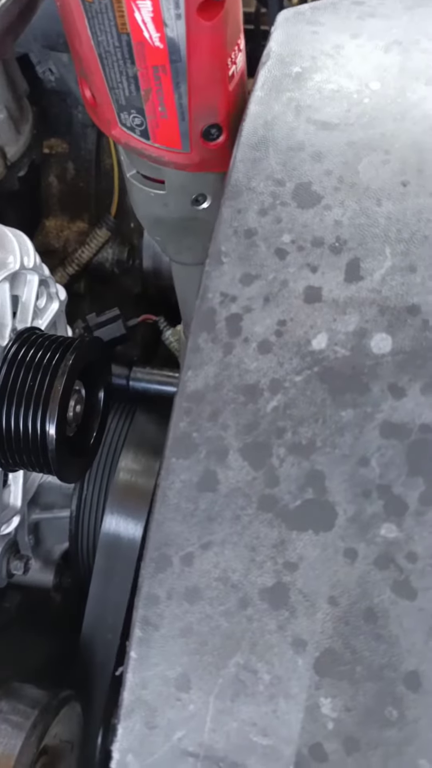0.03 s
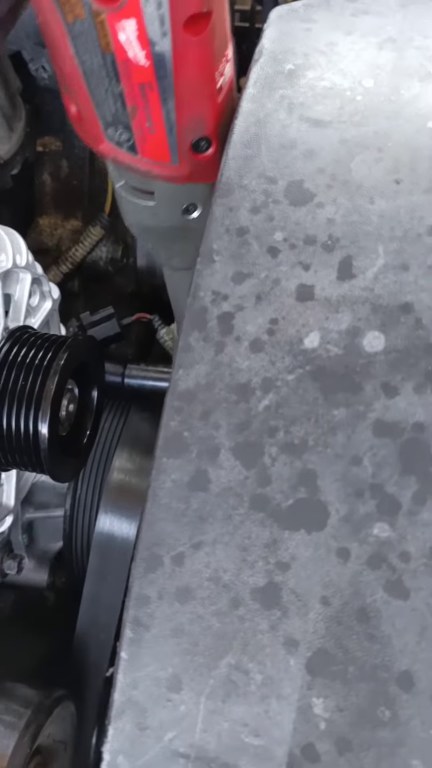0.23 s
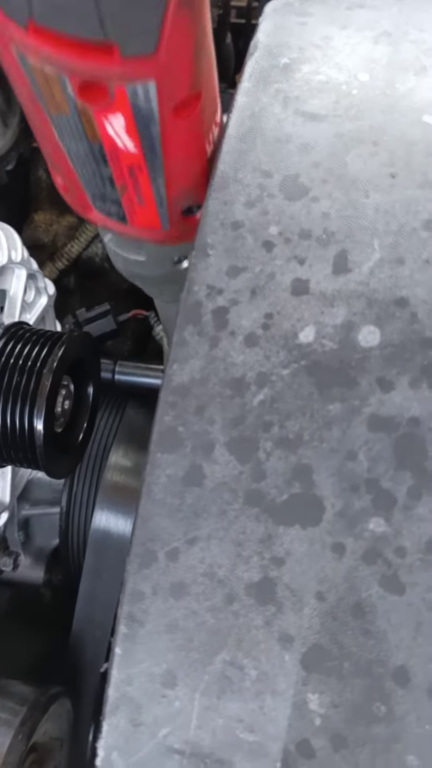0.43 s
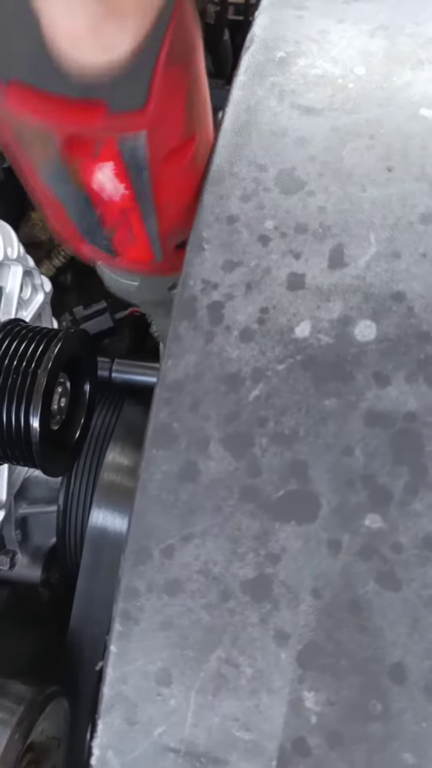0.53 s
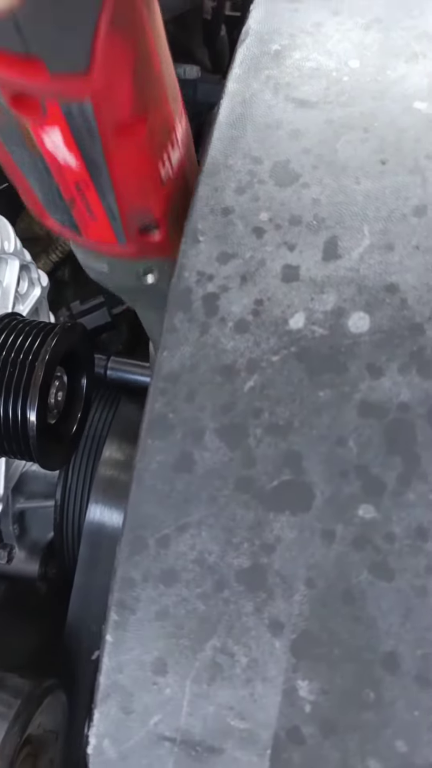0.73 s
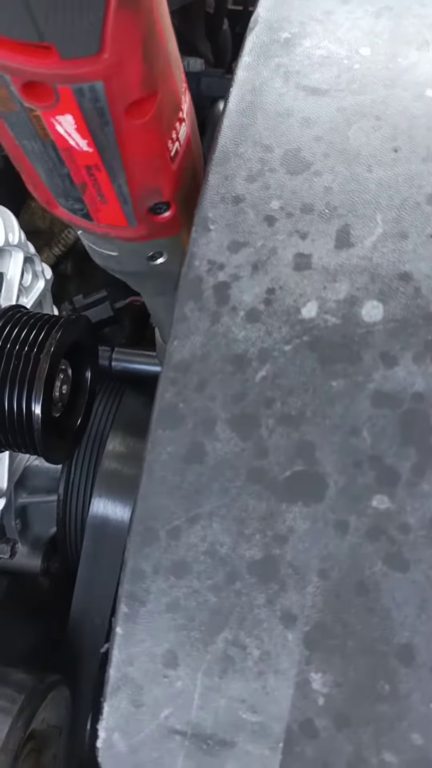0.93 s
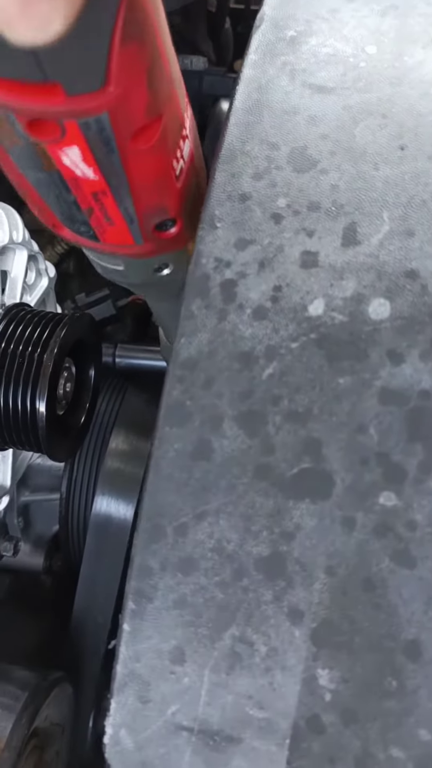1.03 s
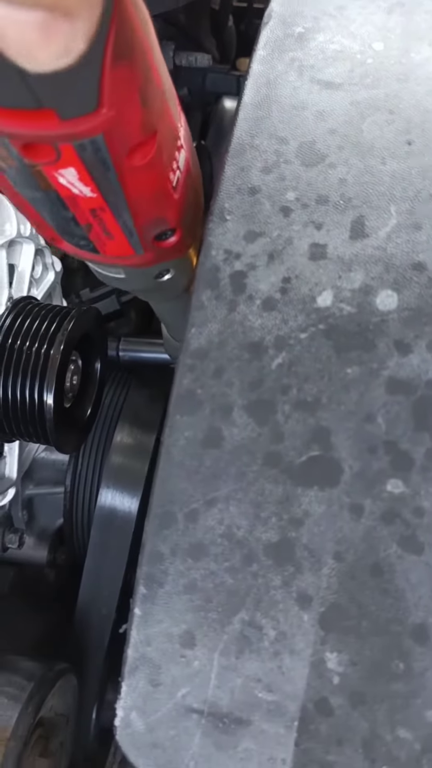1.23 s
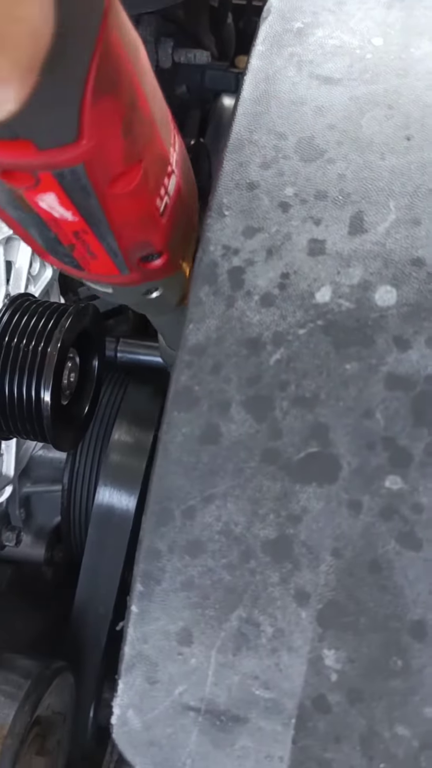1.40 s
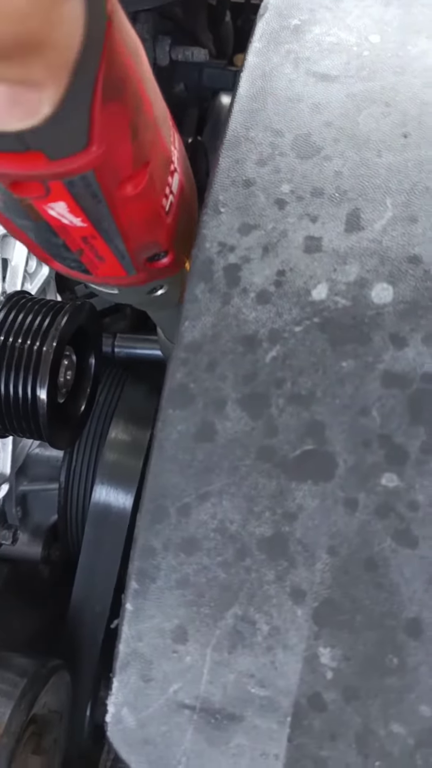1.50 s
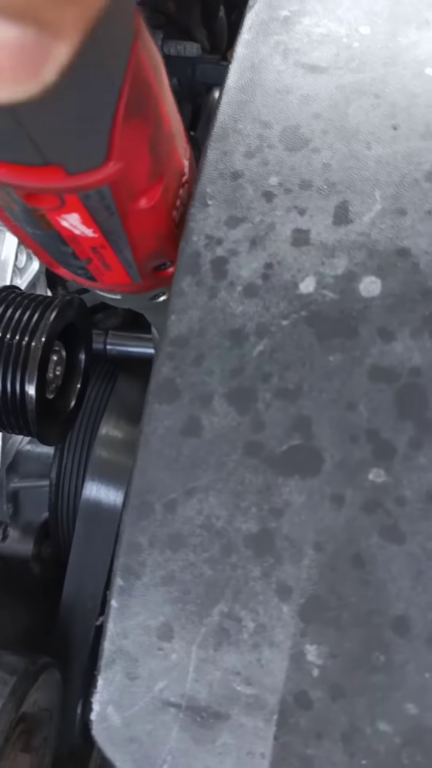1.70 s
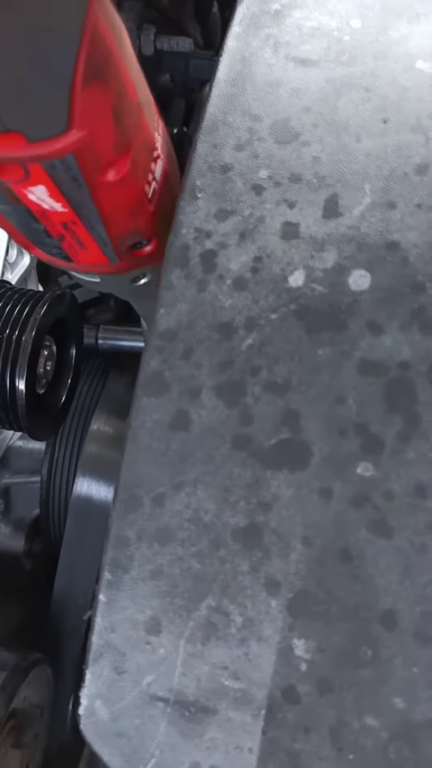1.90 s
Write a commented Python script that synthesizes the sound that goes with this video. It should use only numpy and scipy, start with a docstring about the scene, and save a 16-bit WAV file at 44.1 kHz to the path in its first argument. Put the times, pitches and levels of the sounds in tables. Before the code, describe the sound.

A cordless power ratchet whirs and clatters in one short burst, then light knocks and rubbing

```python
"""A cordless ratchet runs for a third of a second in a car's engine bay, close to the microphone.
Its drive whistles as two tones parting with motor speed; gear teeth and pawl clacks are filtered noise
that also rings the modes of the steel head, and the tool shudders in low resonances.
Decaying partials make the knocks, random grains the rubbing sleeve and the scrapes, resonant noise the
dull bumps, and a short ping with ringing modes one sharp snap of steel, all over low rumble and hum."""
import sys
import numpy as np
from scipy import signal
from scipy.fft import rfft, irfft
from scipy.io import wavfile
from scipy.ndimage import uniform_filter1d

SR = 44100
rng = np.random.default_rng(int(sys.argv[2]) if len(sys.argv) > 2 else 0)


def put_to_file(sound):
    """Save the sound as 16-bit audio at rate SR, in the file named by the first command-line argument."""
    columns = np.atleast_2d(sound).T  # one column per channel
    safe = np.clip(columns, -1, 1)
    whole_steps = np.round(safe * 32767)
    wavfile.write(sys.argv[1], SR, whole_steps.astype(np.int16))


N = 85995
TIME = np.arange(N) / SR  # s


def amp(db):
    """The decibel law: 20 dB is a factor of ten in amplitude."""
    return 10 ** (np.asarray(db) / 20)


def unit(x):
    """Normalisation to an rms of 1, so that a later gain sets the level."""
    return x / np.sqrt(np.mean(x ** 2) + 1e-20)


def curve(rows, axis=1):
    """Linear interpolation of one column of a time table."""
    rows = np.array(rows)
    return np.interp(TIME, rows[:, 0], rows[:, axis])


def colour(x, points):
    """Linear filtering by a spectrum that falls away below its first point; rms 1."""
    hz = np.fft.rfftfreq(N, 1 / SR) + 1
    f, db = np.transpose(points)
    gain = amp(np.interp(np.log(hz), np.log(f), db))
    gain = gain * np.minimum(hz / f[0], 1) ** 2
    return unit(irfft(rfft(x) * gain, N))


def noise(points):
    """Filtered Gaussian noise with the given spectral shape."""
    return colour(rng.standard_normal(N), points)


def blow(start, rise, t60):
    """Impact envelope: a linear rise, then exponential decay by 60 dB in t60 seconds."""
    t = np.maximum(TIME - start, 0)
    decay = np.exp(-np.log(1000) * np.maximum(t - rise, 0) / t60)
    return np.minimum(t / rise, 1) * decay


def tone(hz):
    """Phase as the integral of frequency: a sine of rms 1 on a steady or moving pitch."""
    cycles = np.cumsum(hz * np.ones(N)) / SR + rng.random()
    return np.sqrt(2) * np.sin(2 * np.pi * cycles)


def grains(per_s, spread_db):
    """Shot noise: tiny impacts at random instants, of uneven size and either sign."""
    size = amp(spread_db * np.minimum(rng.exponential(1, N), 3))
    sign = rng.choice([-1, 1], N)
    return size * sign * (rng.random(N) < per_s / SR)


def resonant(modes):
    """Resonance: noise passed by a few peaks, each given by centre Hz, width Hz and dB; rms 1."""
    hz = np.fft.rfftfreq(N, 1 / SR)
    gain = sum(amp(db) / (1 + (2 * (hz - f) / width) ** 2) for f, width, db in modes)
    return unit(irfft(rfft(rng.standard_normal(N)) * gain, N))


# Motor speed. Each row: time in seconds, offset of each whistle line from the drive tone in Hz,
# level of the whistle in dB.
MOTOR_SPEED = [(.235, 11.5, -30.5), (.25, 110, -24), (.262, 300, -20.5), (.28, 570, -12),
               (.305, 1160, -13.5), (.335, 960, -20.5), (.42, 1100, -24), (.5, 1080, -21), (.565, 800, -19),
               (.6, 390, -22)]
DRIVE_HZ, DRIVE_ON_S, DRIVE_OFF_S = 7660, .234, .582
OVERTONE_DB = -14.5  # relative to the drive tone
CARRIER_FADE_HZ = 298  # offset at which the unsplit tone has faded to 1/e
WAVER = .004  # rms pitch waver of the fully split lines, as a share of the drive tone


def whistle():
    """Sidebands: the drive's switching tone splits into two lines that part as the motor gains speed."""
    split = curve(MOTOR_SPEED)
    running = (TIME > DRIVE_ON_S) & (TIME < DRIVE_OFF_S)
    on = uniform_filter1d(1. * running, size=90)  # softened edges
    rest = np.exp(-(split / CARRIER_FADE_HZ) ** 2)  # near 1 at low speed
    carrier = tone(DRIVE_HZ) + amp(OVERTONE_DB) * tone(2 * DRIVE_HZ)
    slow_noise = unit(uniform_filter1d(rng.standard_normal(N), size=300))
    offset = split + WAVER * DRIVE_HZ * (1 - rest) * slow_noise
    lines = (tone(DRIVE_HZ + offset) + tone(DRIVE_HZ - offset)) / np.sqrt(2)
    return on * amp(curve(MOTOR_SPEED, axis=2)) * (rest * carrier + (1 - rest) * lines)


# Gear rattle. Each row: time in seconds, level on the steel in dB.
GEAR_RATTLE = [(.16, -94), (.2, -54), (.243, -44), (.25, -26), (.268, -19), (.3, -10), (.44, -6.5),
               (.52, -10.5), (.575, -15), (.6, -35.5), (.635, -39), (.675, -72), (.695, -42.5), (.75, -50),
               (.785, -79), (.82, -96)]
# Pawl clacks. Each row: start in seconds, level of the steel in dB, level of the housing in dB.
PAWL_CLACKS = [(0.247, -18, -46), (0.261, -18, -41), (0.277, -15, -23.5), (0.287, -7.5, -22.5),
               (.302, -7.5, -16.5), (.312, 1, -12.5), (0.325, -3, -19), (.339, -3, -8), (0.353, -0.5, -21),
               (.3615, 0.5, -11), (0.373, -8.5, -20.5), (0.383, -1.5, -13.5), (0.394, -10.5, -20),
               (0.405, -1, -14), (0.417, -6.5, -17.5), (.426, 2, -6.5), (.434, -7.5, -14.5),
               (0.4489, 0.5, -9.5), (.457, -3.5, -16.5), (.462, -3.5, -19.5), (0.4741, 2, -7.5),
               (0.482, 1.5, -11), (0.4873, 0.5, -19.5), (0.5, 1, -6.5), (0.503, 0.5, -12),
               (0.511, -1.5, -20), (0.524, -3, -29), (0.5333, -6, -14), (0.5361, 2.5, -13.5),
               (0.5485, -3.5, -19), (.557, -7.5, -13.5), (0.562, -10.5, -36), (.577, -0.5, -10),
               (0.6152, -10.5, -28), (0.6397, -37.5, -35), (0.647, -46, -40), (.663, -47, -43),
               (0.685, -27, -50), (0.691, -27, -49), (.712, -38.5, -54), (.7161, -32, -56),
               (0.721, -33.5, -65), (.735, -39.5, -55), (0.745, -42, -60), (.755, -34, -42.5),
               (0.8056, -43.5, -71)]
# Spectra of the steel and of the duller housing. Each row: frequency in Hz, relative density in dB per Hz.
STEEL_SPECTRUM = [(1060, -48), (1800, -19.5), (1930, -16.5), (2250, -29), (2600, -11), (3540, -5.5),
                  (4200, -6.5), (4430, -3.5), (5160, -5), (5600, -2), (6070, -5), (6650, -1), (7610, -4.5),
                  (8710, 1.5), (12300, -15.5), (15000, -13), (15500, -6.5)]
HOUSING_SPECTRUM = [(100, -23), (300, -12), (600, -9), (900, -2), (1200, -2.5), (1550, 1), (2100, -6.5),
                    (2800, -4.5), (5000, -24)]
# Modes of the steel head. Each row: frequency in Hz, relative level in dB, t60 in seconds.
HEAD_MODES = [(4820, 5, .07), (5460, -6, 0.079), (5650, 10, 0.059), (6650, -1, .08), (6500, 0, .08),
              (6760, 2, .08), (8000, 1, .07), (8880, -1.5, 0.032), (8150, -7, 0.033), (8660, 2.5, 0.03),
              (9800, -14.5, .16), (9460, -12, 0.063), (10600, -5, 0.038)]
TEETH_PER_S, TEETH_SPREAD_DB = 1300, 2.5  # mean rate, scale of the uneven sizes
CLACK_RISE_S, CLACK_T60_S, HOUSING_T60_S = 0.0011, 0.03, 0.046
GEAR_HOUSING_DB, HEAD_DB = -14.5, -14.5  # relative to the gears on steel, and to all of the steel


def ratchet():
    """Modal excitation: gear teeth and pawl clacks drive the steel head and the duller housing."""
    teeth = grains(TEETH_PER_S, TEETH_SPREAD_DB)
    level = amp(curve(GEAR_RATTLE))
    # overlapping clacks add in power
    bright = np.sqrt(sum((amp(db) * blow(s, CLACK_RISE_S, CLACK_T60_S)) ** 2 for s, db, _ in PAWL_CLACKS))
    dull = np.sqrt(sum((amp(db) * blow(s, CLACK_RISE_S, HOUSING_T60_S)) ** 2 for s, _, db in PAWL_CLACKS))
    steel = level * colour(teeth, STEEL_SPECTRUM) + bright * noise(STEEL_SPECTRUM)
    gear_housing = amp(GEAR_HOUSING_DB) * level * colour(teeth, HOUSING_SPECTRUM)
    housing = gear_housing + dull * noise(HOUSING_SPECTRUM)
    head_response = sum(amp(db) * blow(0, 1 / SR, t60) * tone(hz) for hz, db, t60 in HEAD_MODES)
    ring = unit(signal.fftconvolve(steel, head_response)[:N]) * steel.std()
    return steel + housing + amp(HEAD_DB) * ring


# Shudder of the tool. Each row: time in seconds, level of the bass in dB, level of the low middle in dB.
SHUDDER_LEVELS = [(.28, -80.5, -71), (.315, -70, -42), (.45, -46, -34), (.52, -22.5, -38.5),
                  (.585, -29, -25), (.61, -34, -34), (.68, -39, -43.5), (.74, -59, -55), (.83, -64, -75)]
# Its bass and low middle resonances. Each row: frequency in Hz, width in Hz, relative level in dB.
BASS_RESONANCES = [(92, 14, -3.5), (129, 10, 4)]
MIDDLE_RESONANCES = [(228, 64, -9), (332.3, 26, 2.5), (383, 35, -6.5), (596, 250, -12)]


def shudder():
    """Forced vibration: the tool shakes the low resonances of what it leans on."""
    bass = amp(curve(SHUDDER_LEVELS)) * resonant(BASS_RESONANCES)
    middle = amp(curve(SHUDDER_LEVELS, axis=2)) * resonant(MIDDLE_RESONANCES)
    return bass + middle


# Knocks of tool on engine. Each row: start in seconds, clatter in dB, ring in Hz, ring in dB, t60 in seconds.
ENGINE_KNOCKS = [(.188, -41.5, 1518, -38.5, 0.035), (0.2057, -42, 1621, -44, .05),
                 (0.7571, -36.5, 1023, -34.5, 0.028), (0.8452, -46.5, 1434, -36.5, 0.037),
                 (1.3332, -28.5, 1678, -40.5, 0.037), (1.505, -43, 820, -40, 0.1),
                 (1.587, -50, 1444, -48, 0.031), (1.837, -50, 2620, -48, 0.037),
                 (1.881, -55, 2520, -58, 0.027)]
# Partials of each knock. Each row: multiple of the ring frequency, level relative to the ring in dB.
PARTIALS = [(1, -1), (1.052, -2.5), (1.412, -12), (1.8, -10), (2.15, -11), (2.42, -19)]
# Spectrum of the clatter. Each row: frequency in Hz, relative density in dB per Hz.
CLATTER_SPECTRUM = [(300, -34.5), (900, -9.5), (1600, 3), (2300, -1.5), (3500, 3), (6000, 0.5), (9000, -8),
                    (11000, -24), (15500, -28)]
# Long faint rings. Each row: start in seconds, frequency in Hz, level in dB, t60 in seconds.
FAINT_RINGS = [(.76, 2977, -59, 1.0), (.8448, 1520, -66, .5), (.8448, 797, -63, .7), (.05, 797, -61, .5)]
KNOCK_RISE_S, RING_RISE_S = 0.0023, .04


def knocks():
    """Inharmonic free vibration: each contact is a clatter and short partials; some parts ring on faintly."""
    clatter = noise(CLATTER_SPECTRUM)
    out = np.zeros(N)
    for s, db, hz, ring_db, t60 in ENGINE_KNOCKS:
        ring = sum(amp(part_db) * tone(hz * multiple) for multiple, part_db in PARTIALS)
        out += blow(s, KNOCK_RISE_S, t60) * (amp(db) * clatter + amp(ring_db) * ring)
    return out + sum(amp(db) * blow(s, RING_RISE_S, t60) * tone(hz) for s, hz, db, t60 in FAINT_RINGS)


def high_pass(x, hz, order=6):
    """Butterworth filtering that cuts the bass steeply."""
    return signal.sosfilt(signal.butter(order, hz, "high", fs=SR, output="sos"), x)


# Small parts that ring after the snap. Each row: frequency in Hz, level in dB, t60 in seconds.
SNAP_PART_MODES = [(740, -45, .04), (904, -40, 0.052), (1517, -44, 0.036), (2770, -40, 0.038),
                   (3295, -43, .05), (7110, -26, 0.048), (8200, -42, 0.036), (11220, -31, 0.019)]
# Spectrum of the snap's clatter. Each row: frequency in Hz, relative density in dB per Hz.
SNAP_SPECTRUM = [(500, -47), (660, -8), (850, 2), (1150, -15), (1500, -3), (2150, -17.5), (2800, 3.5),
                 (3400, -4.5), (4200, -12.5), (6000, -13), (6900, 5), (7800, -5), (8600, 3), (10000, -13),
                 (11200, -4.5), (12500, -22), (16000, -14)]
SNAP_S, SNAP_DB, SNAP_HZ, SNAP_LENGTH_S = 1.6133, -9.5, 6900, 0.0031  # the ping
SNAP_CLATTER_DB, SNAP_T60_S, SNAP_LOW_HZ = -16.5, 0.034, 620


def snap():
    """Impulsive excitation: a very short high ping of steel, then the small parts ring, with the bass cut."""
    window = np.sin(np.pi * np.clip((TIME - SNAP_S) / SNAP_LENGTH_S, 0, 1)) ** 2
    ping = window * tone(SNAP_HZ) / np.sqrt(2)
    modes = sum(amp(db) * blow(SNAP_S, CLACK_RISE_S, t60) * tone(hz) for hz, db, t60 in SNAP_PART_MODES)
    clatter = amp(SNAP_CLATTER_DB) * blow(SNAP_S, CLACK_RISE_S, SNAP_T60_S) * noise(SNAP_SPECTRUM)
    return amp(SNAP_DB) * ping + high_pass(modes + clatter, SNAP_LOW_HZ)


# Short bright slides of steel on steel. Each row: middle in seconds, half length in seconds, level in dB.
STEEL_SLIDES = [(0.718, 0.0045, -40), (1.462, .008, -52), (1.573, 0.015, -49), (1.703, .014, -55)]
# Spectrum of the slides. Each row: frequency in Hz, relative density in dB per Hz.
SLIDE_SPECTRUM = [(2500, -18), (4500, -4), (7000, -3), (9200, 7), (11000, -7), (14000, -3), (15500, -5)]
SLIDE_GRAINS_PER_S, FRICTION_SPREAD_DB = 6600, 4.5  # the spread serves the sleeve too


def slides():
    """Friction as many tiny impacts: the socket shifts on the bolt with a brief fine scrape."""
    level = sum(amp(db) * np.exp(-((TIME - s) / half) ** 2) for s, half, db in STEEL_SLIDES)
    return level * colour(grains(SLIDE_GRAINS_PER_S, FRICTION_SPREAD_DB), SLIDE_SPECTRUM)


# Sleeve rubbing. Each row: time in seconds, level of the body in dB, level of the treble in dB.
RUB_LEVELS = [(0, -81, -76.5), (.13, -75.5, -73), (.2, -55.5, -56), (.7, -47.5, -51.5), (.86, -68, -70.5),
              (.95, -77, -69), (1.03, -55, -56.5), (1.09, -46, -49), (1.16, -54, -57), (1.24, -66.5, -63),
              (1.29, -80, -73), (1.36, -50, -54.5), (1.42, -51, -54.5), (1.48, -53, -55.5),
              (1.57, -59, -51), (1.63, -52, -52), (1.7, -46.5, -47), (1.74, -50.5, -54), (1.82, -49, -54),
              (1.88, -61, -60.5), (1.95, -75, -70)]
# Spectra of the rub's body and treble. Each row: frequency in Hz, relative density in dB per Hz.
BODY_SPECTRUM = [(100, -12.5), (280, -9), (450, -21), (630, -8.5), (800, 4.5), (1100, -1.5), (1450, 2.5),
                 (1850, -8.5), (2300, -34), (4000, -48)]
TREBLE_SPECTRUM = [(1200, -24.5), (2300, -5), (3000, 1.5), (3700, 3), (4500, -1), (5500, 4), (7000, 1),
                   (9000, 2.5), (10300, -8), (12500, -13), (15500, -6)]
RUB_GRAINS_PER_S = 9000


def sleeve():
    """Friction of cloth: the sleeve rubs in fine grains that sound in a body and a treble band."""
    fibres = grains(RUB_GRAINS_PER_S, FRICTION_SPREAD_DB)
    body = amp(curve(RUB_LEVELS)) * colour(fibres, BODY_SPECTRUM)
    treble = amp(curve(RUB_LEVELS, axis=2)) * colour(fibres, TREBLE_SPECTRUM)
    return body + treble


# Dull bumps of hand and tool. Each row: start in seconds, level in dB, resonance in Hz, t60 in seconds.
DULL_BUMPS = [(0, -57.5, 543, .12), (0.074, -53.5, 280, 0.27), (.9, -57, 650, 0.11),
              (1.105, -51, 277, 0.16), (1.454, -55.5, 535, 0.14), (1.502, -41, 540, 0.18),
              (1.506, -39, 283, .16), (1.525, -41, 210, 0.13), (1.568, -44.5, 243, 0.11),
              (1.834, -49, 590, 0.059), (1.849, -48.5, 282, 0.1)]
BUMP_RISE_S, BUMP_WIDTH = 0.0087, 0.41  # the width is a share of the resonance


def bumps():
    """Damped broad resonance: the hand bumps the tool against hollow parts."""
    out = np.zeros(N)
    for s, db, hz, t60 in DULL_BUMPS:
        out += amp(db) * blow(s, BUMP_RISE_S, t60) * resonant([(hz, BUMP_WIDTH * hz, 0)])
    return out


BAY_DB, BAY_T60_S = -11.5, 0.1


def bay(x):
    """Reverberation: convolution with a short dense tail of reflections from the engine bay."""
    tail = rng.standard_normal(N) * blow(.002, .003, BAY_T60_S)
    return signal.fftconvolve(x, tail / np.linalg.norm(tail))[:N]


# Spectrum of the workshop's rumble. Each row: frequency in Hz, relative density in dB per Hz.
RUMBLE_SPECTRUM = [(20, -22), (40, -18.5), (58, -2.5), (75, 0.5), (120, 4), (170, -2), (250, -17),
                   (450, -32.5), (800, -30), (1500, -32.5), (2300, -50), (4000, -53), (8500, -30.5),
                   (10500, -59), (15000, -63)]
RUMBLE_DB, HUM_HZ, HUM_DB = -53, 59.74, -60.5


def workshop():
    """Stationary background: low filtered noise and one steady hum."""
    return amp(RUMBLE_DB) * noise(RUMBLE_SPECTRUM) + amp(HUM_DB) * tone(HUM_HZ)


def scene():
    """Superposition of tool, reflections and handling over the workshop's low rumble and hum."""
    tool = whistle() + ratchet() + knocks()
    background = workshop()
    reflected = amp(BAY_DB) * bay(tool)
    steel_contacts = snap() + slides()
    return (tool + reflected + steel_contacts + shudder() + sleeve() + bumps() + background)[None]


AGC_THRESHOLD_DB, AGC_SHARE = -20.5, 0.7  # share of the excess in dB that is taken away
AGC_ATTACK_S, AGC_RELEASE_DB_PER_S = 0.01, 111.5  # of the level detector
CEILING, EDGE_HZ = .78, 15650  # soft peak limit as amplitude, band limit


def record(dry):
    """Compression: gain control turns loud sound down; then a soft peak limit and the band limit."""
    keep = np.exp(-1 / (AGC_ATTACK_S * SR))
    power = signal.lfilter([1 - keep], [1, -keep], dry[0] ** 2)
    power_db = 10 * np.log10(power + 1e-12)
    # the detector holds peaks that sink at a steady rate in dB
    fall = AGC_RELEASE_DB_PER_S * TIME
    held_db = np.maximum.accumulate(power_db + fall) - fall
    over_db = np.maximum(held_db - AGC_THRESHOLD_DB, 0)
    ducked = dry / amp(AGC_SHARE * uniform_filter1d(over_db, size=130))
    limited = ducked / (1 + (ducked / CEILING) ** 4) ** .25
    low_pass = signal.firwin(301, EDGE_HZ, window=("kaiser", 8), fs=SR)
    return signal.oaconvolve(limited, low_pass[None], "same")


dry = scene()
out = record(dry)
put_to_file(out)
```